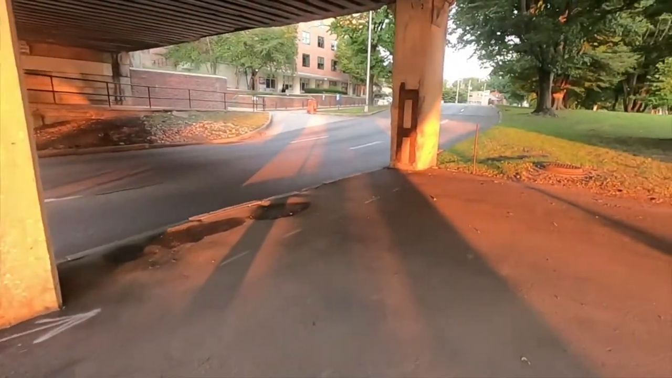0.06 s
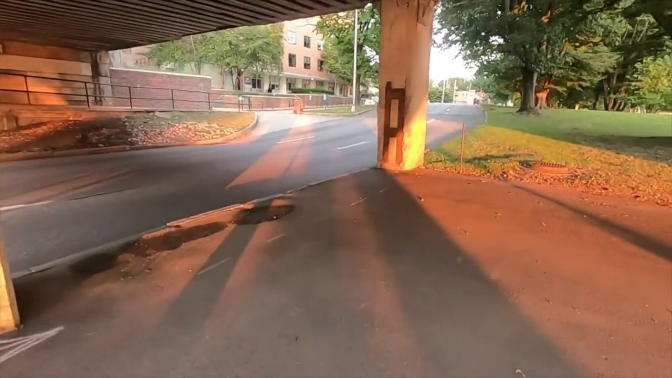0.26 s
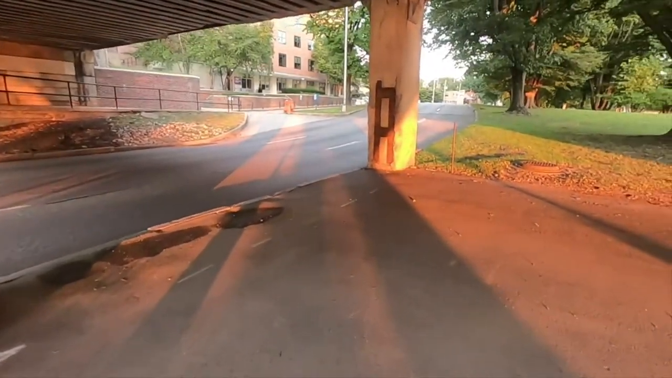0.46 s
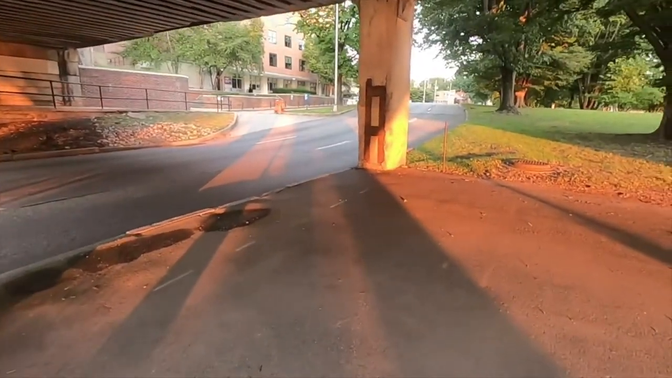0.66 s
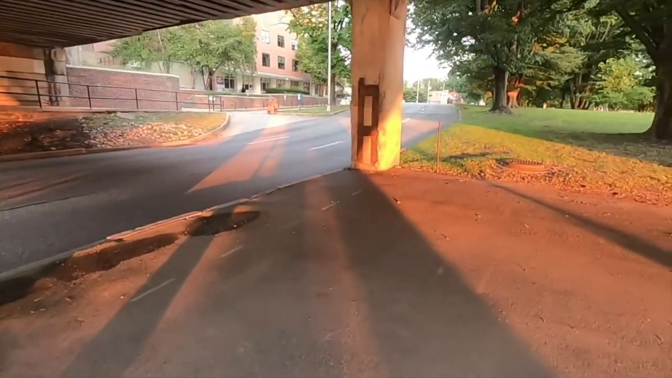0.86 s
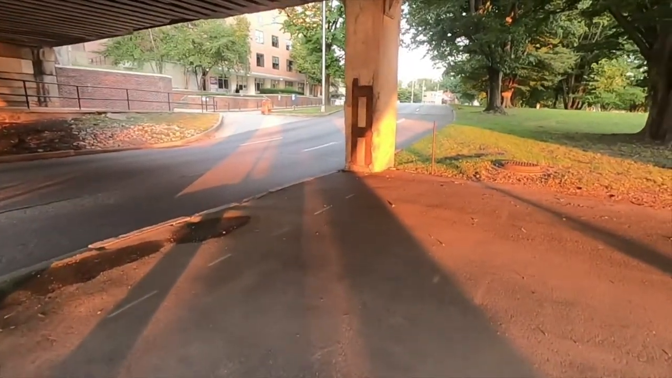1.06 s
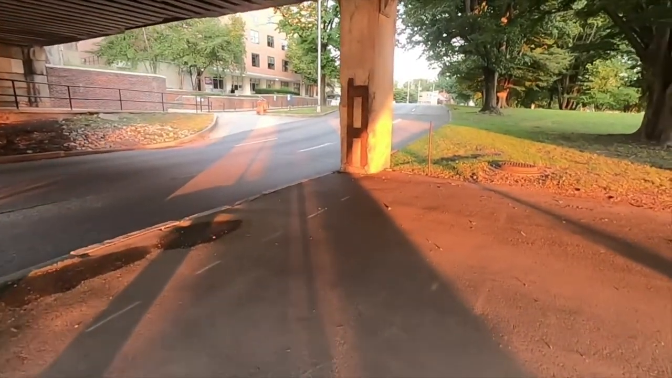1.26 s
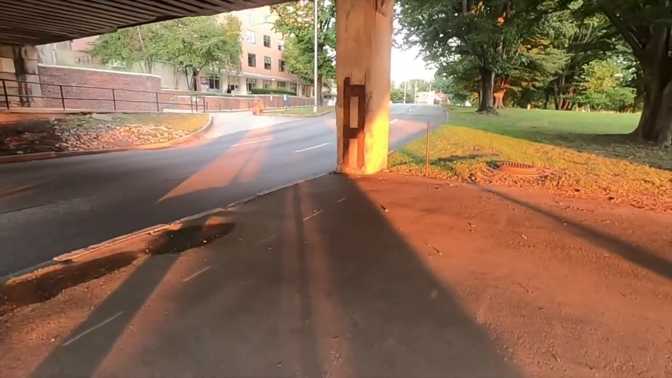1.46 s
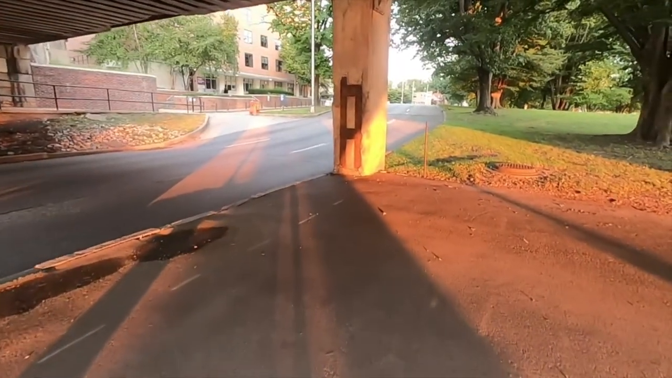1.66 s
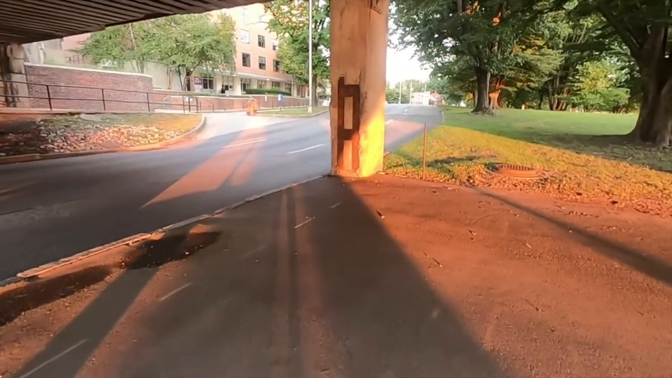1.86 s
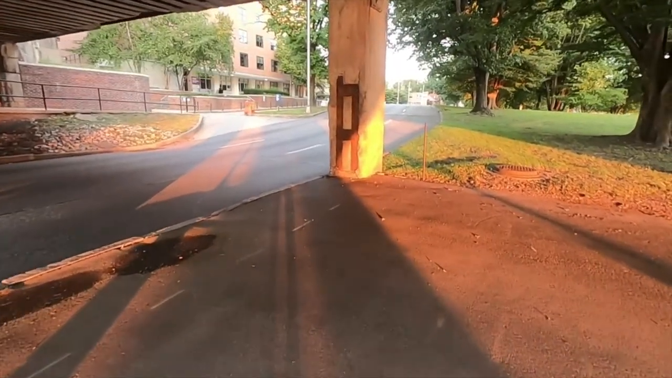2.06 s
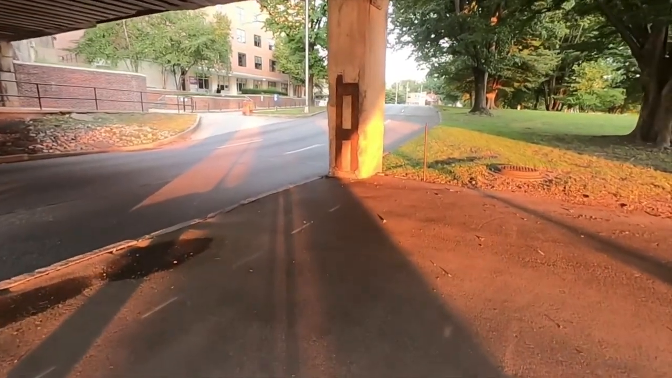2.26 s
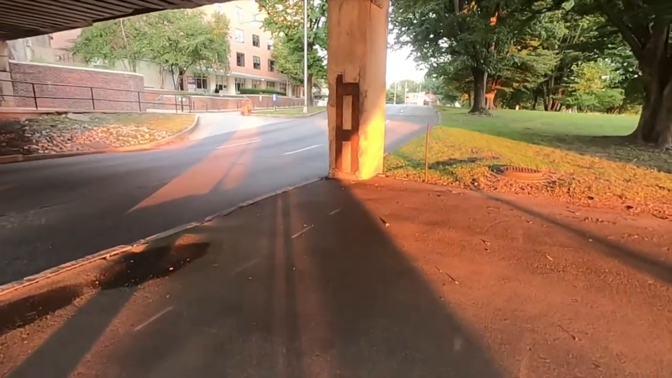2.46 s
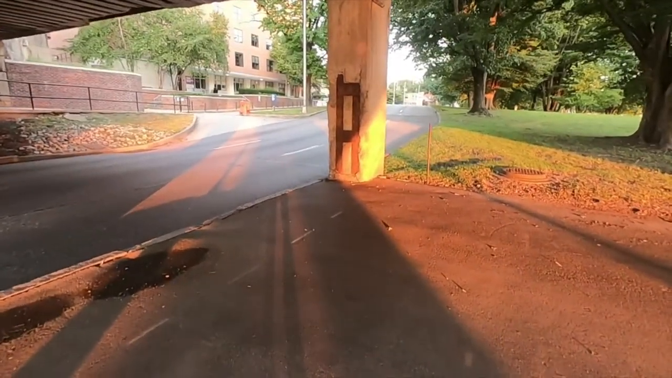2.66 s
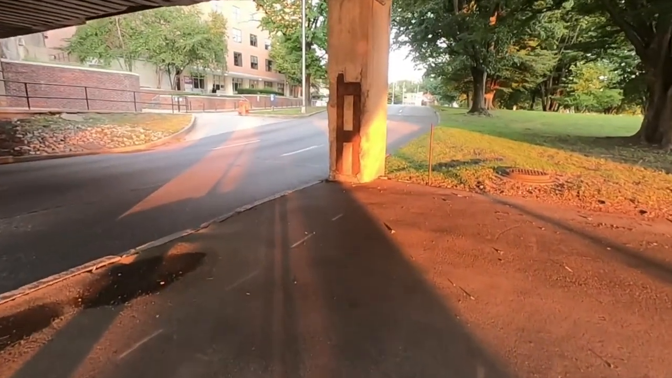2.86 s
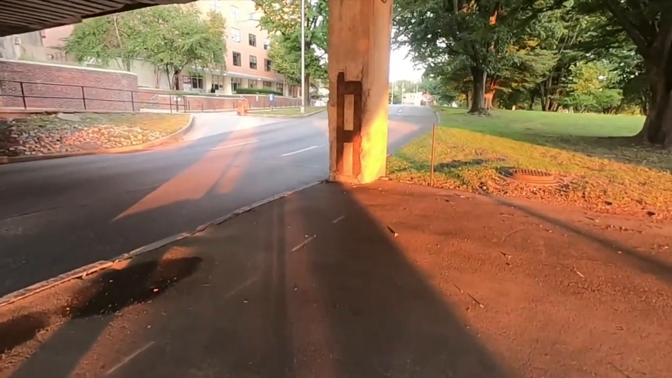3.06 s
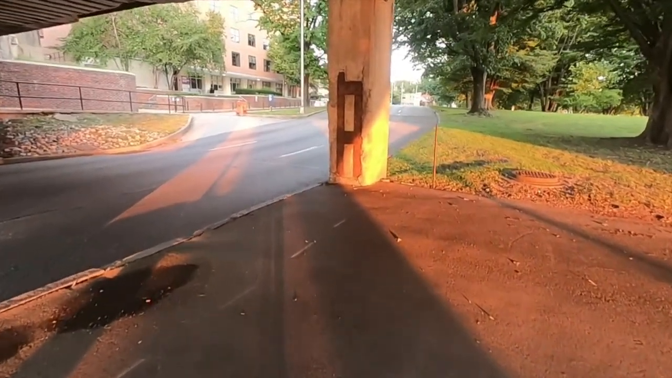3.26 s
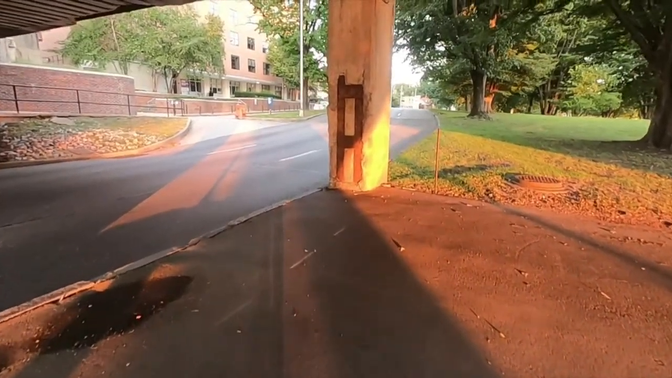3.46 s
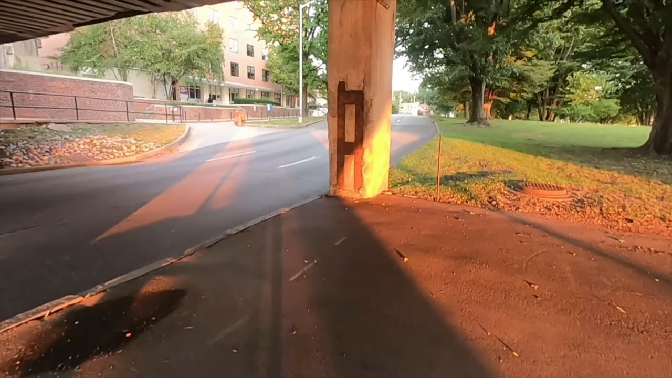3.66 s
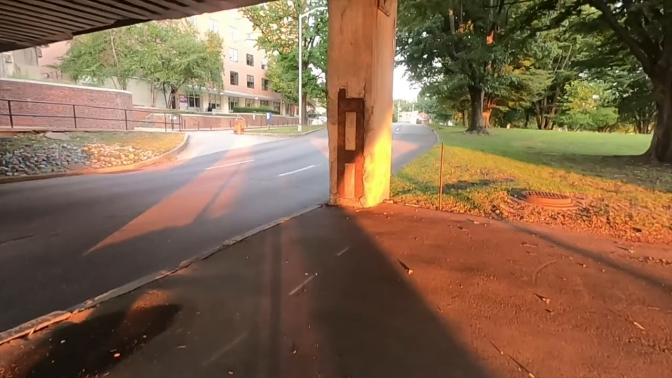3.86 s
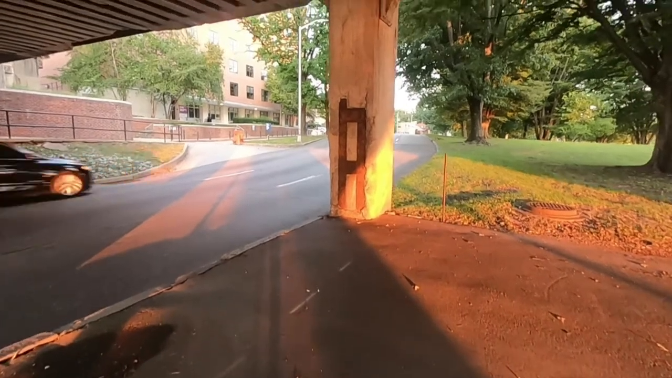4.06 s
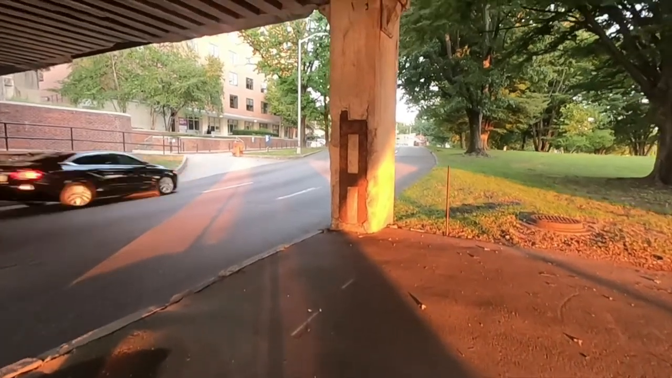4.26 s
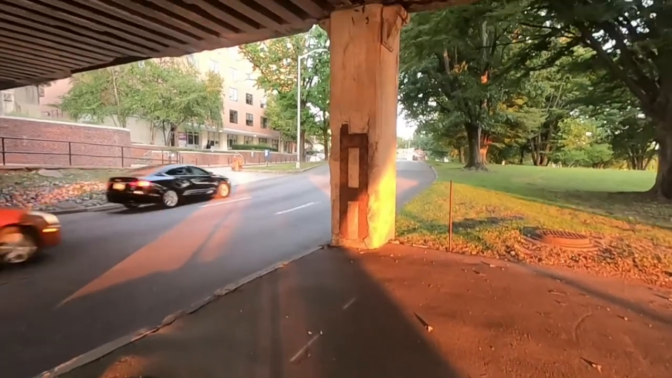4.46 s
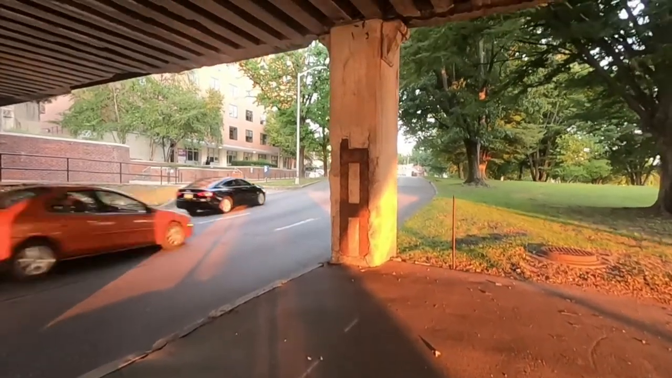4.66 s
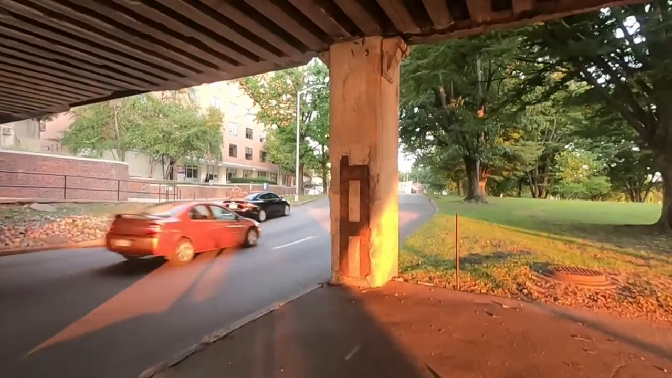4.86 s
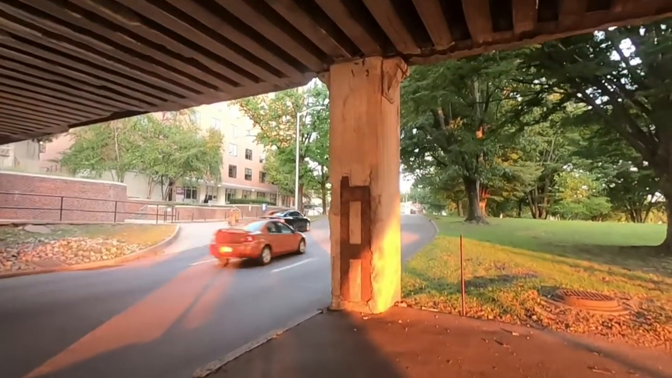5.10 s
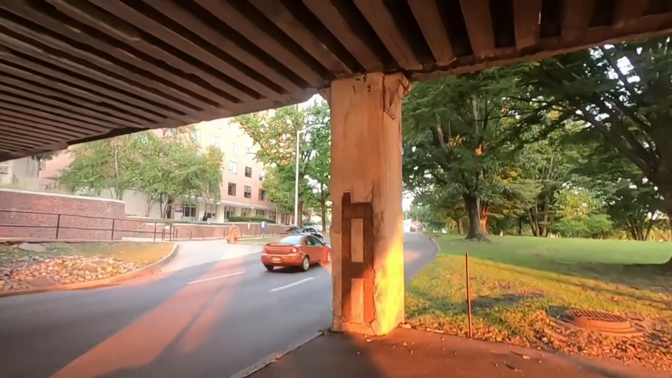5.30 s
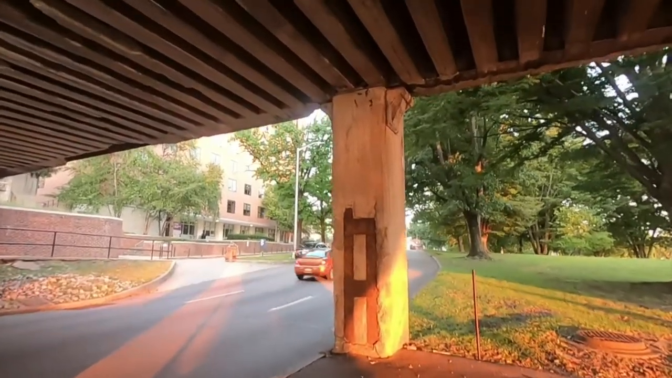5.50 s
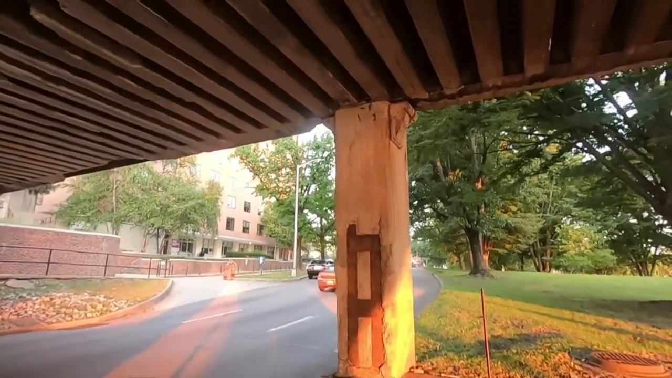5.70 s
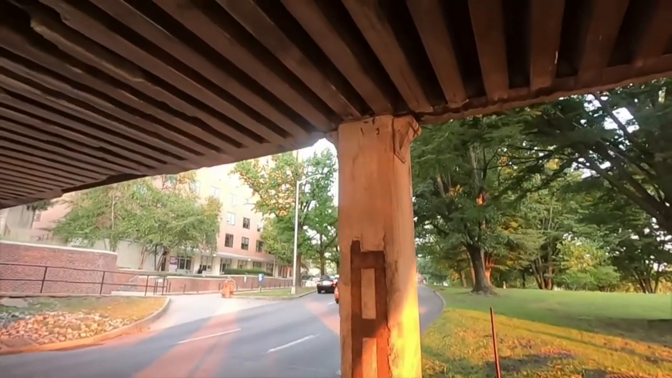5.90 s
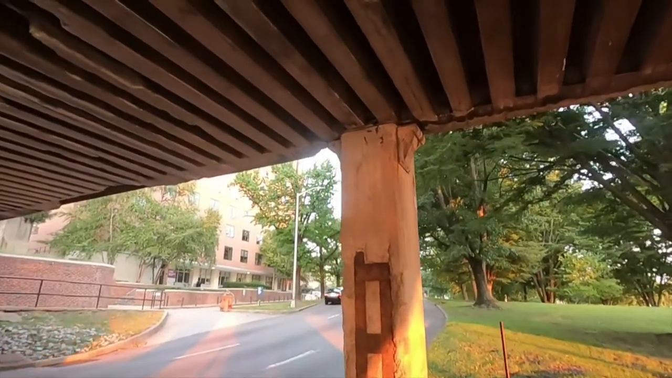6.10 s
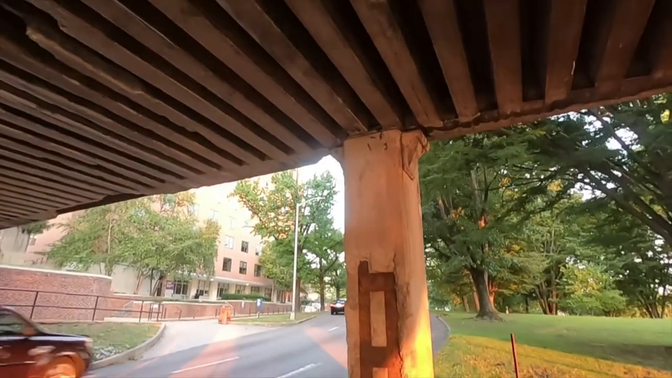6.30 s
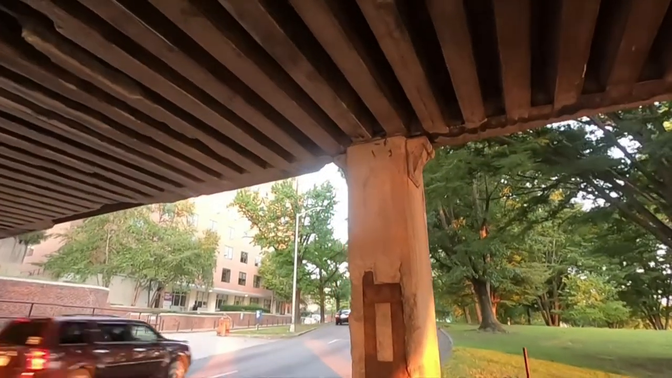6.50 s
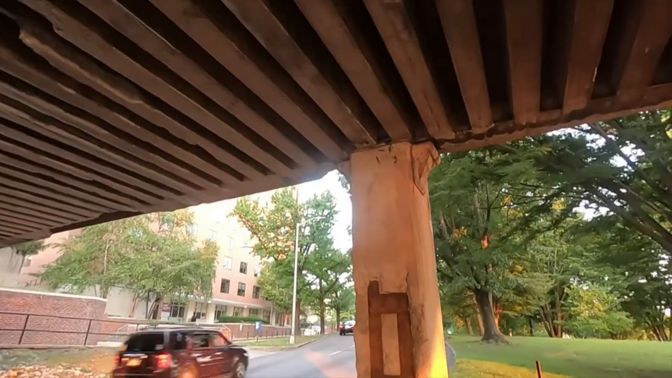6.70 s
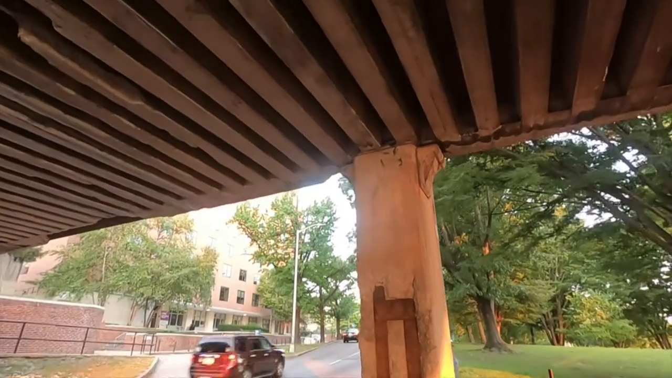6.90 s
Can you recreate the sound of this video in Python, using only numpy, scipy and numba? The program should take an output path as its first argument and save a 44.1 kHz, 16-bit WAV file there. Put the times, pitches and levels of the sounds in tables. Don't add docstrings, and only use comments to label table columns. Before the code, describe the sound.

In an underpass, quiet traffic rumble and distant town hiss gradually give way to passing cars. A small tap and grit ticks sound beside the small camera microphone early on. Five passes follow, each stronger: soft rush, fuller rush, two overlapping roars near four seconds, then the heaviest, with exhaust boom and a broken, singing tyre hum. Short concrete reflections thicken everything, and the microphone gain dips slightly.

```python
import sys
import numpy as np
from scipy import signal
from scipy.fft import rfft, irfft, next_fast_len
from scipy.io import wavfile
from scipy.ndimage import uniform_filter1d
from numba import njit

SR = 44100
rng = np.random.default_rng(int(sys.argv[2]) if len(sys.argv) > 2 else 0)


def transcribe(u):
    v = np.clip(np.atleast_2d(u).T, -1, 1)
    q = np.round(v * 32767).astype(np.int16)
    wavfile.write(sys.argv[1], SR, q)


def natural_amplitude(level_db):
    exponent = np.asarray(level_db, float) / 20
    return 10 ** exponent


N = 306054
T = np.arange(N) / SR
NEAR_S = 0.57
HUM_FADE_DB_PER_S = 93.5


def colour(shape):
    hz, db = np.transpose(shape)
    size = next_fast_len(N)
    f = np.maximum(np.fft.rfftfreq(size, 1 / SR), 1)
    gain = natural_amplitude(np.interp(np.log(f), np.log(hz), db, left=-200, right=-200))
    x = irfft(rfft(rng.standard_normal(size)) * gain, size)[:N]
    return x / x.std()


def walk(rate):
    fine = 16
    w = np.repeat(rng.standard_normal(int(N * rate / SR) + 2), fine)
    w = uniform_filter1d(uniform_filter1d(w, size=fine), size=fine)
    return np.interp(T * rate * fine, np.arange(len(w)), w / w.std())


def held(start, length, rise_db_per_s, fall_db_per_s):
    rise_db = -rise_db_per_s * np.maximum(start - T, 0)
    fall_db = -fall_db_per_s * np.maximum(T - start - length, 0)
    return rise_db + fall_db


def rush(shape, db, flicker_db):
    return colour(shape) * natural_amplitude(db + flicker_db * walk(rate=11))


def hum(hz, waver_hz, db):
    phase = 2 * np.pi * np.cumsum(hz + waver_hz * walk(rate=30)) / SR
    return np.sqrt(2) * natural_amplitude(db + 1.9 * walk(rate=14)) * np.sin(phase)


@njit
def resonance(x, hz, width):
    y, band, low = np.empty(len(x)), 0., 0.
    for i in range(len(x)):
        g = np.tan(np.pi * hz[i] / SR)
        k = width / hz[i]
        v = (band + g * (x[i] - low)) / (1 + g * (g + k))
        band = 2 * v - band
        low = low + 2 * g * v
        y[i] = k * v
    return y


# time level with it in seconds, then the levels in dB of
CARS = [
    (1.95, -39.5, -40.5, -79, -37.5),
    (2.85, -29, -37, -70.5, -38.5),
    (3.95, -26, -38, -60.5, -32),
    (4.55, -23, -37.5, -55.5, -29),
    (6.35, -20.5, -34.5, -59, -23),
]
TYRES, PUMPED_AIR, HISSING, ENGINE = 1, 2, 3, 4


def carried(column, over_db, coming_db, going_db, early_s, far_db, screen_db=0):
    power = natural_amplitude(far_db + 0 * T) ** 2
    for car in CARS:
        ahead = car[0] - early_s - T
        loss_db = np.where(ahead > 0, coming_db, going_db) / 2 * np.log10(1 + (ahead / NEAR_S) ** 2)
        hidden = np.clip((car[0] - .24 - T) / .056, 0, 1)
        power = power + natural_amplitude(car[column] + over_db - loss_db + screen_db * hidden) ** 2
    return 10 * np.log10(power)


# frequency in Hz, level in dB per Hz.
TOWN = [(1800, -17.5), (3000, 4.5), (3900, 2.5), (5000, 1.5), (6300, -5), (7700, -13), (8900, -19),
        (9500, -31), (10500, -29.5), (11300, -37.5), (12200, -49.5), (14000, -72.5)]


def town():
    level_db = carried(PUMPED_AIR, over_db=-18, coming_db=13, going_db=10, early_s=1.5, far_db=-51.5)
    return rush(TOWN, level_db, .3)


# start in seconds, length in seconds, first
# pitch in Hz, last pitch in Hz, level in dB.
HUMS = [
    (1.05, .3, 181, 180, -36),
    (2.3, 1.0, 142, 137, -37),
    (3.7, .4, 205, 202, -31),
    (3.95, .5, 228, 225, -29),
    (5.0, .55, 148, 159, -28),
    (2.7, .65, 228, 222, -33),
    (3.7, .6, 64, 64, -31),
    (3.3, .25, 121, 119, -29),
    (4.17, .15, 124, 122, -31),
    (4.7, .5, 72.5, 76, -26),
]


def hums():
    idle_db, idle_stops_s = -30, 1.96
    out = hum(hz=84.2, waver_hz=.5, db=idle_db + held(0, idle_stops_s, 0, HUM_FADE_DB_PER_S))
    for s, length, first, last, db in HUMS:
        hz = np.interp(T, [s, s + length], [first, last])
        out = out + hum(hz, .02 * hz, db + held(s, length, HUM_FADE_DB_PER_S, HUM_FADE_DB_PER_S))
    return out


# time in seconds, level in dB.
TICKS = [
    (.053, -58),
    (.485, -62),
    (.65, -61),
    (1.05, -64),
    (1.45, -62),
    (1.55, -63),
    (2.05, -61),
]


def shoe():
    hiss = colour([(7000, -7), (10000, 2.5), (12000, 0), (14500, -17)])
    scuff_db = -68.5 + held(.255, 0, rise_db_per_s=200, fall_db_per_s=254)
    push = natural_amplitude(scuff_db + 2.5 * walk(rate=150))
    for s, db in TICKS:
        push += natural_amplitude(db - 12) * np.exp(-((T - s) / .001) ** 2)
    tap_hz, tap_db, tap_span_s = 1250, -16, .00045
    t = T - .2625
    tap = natural_amplitude(tap_db) * np.sin(2 * np.pi * tap_hz * t) * np.exp(-(t / tap_span_s) ** 2)
    return hiss * push + tap


# frequency in Hz, level in dB per Hz.
DECK = [(10, -22), (24, -2), (38, -2.5), (65, -0.5), (88, -3), (110, -18.5)]
EXHAUST = [(70, -2), (100, -3), (135, 0), (175, 0), (230, -17.5)]
CAVITY = [(160, -28.5), (195, 0.5), (230, 1.5), (265, -1), (320, -23.5)]


def boom():
    deck_db = -27.5 + held(0, 5.4, 0, fall_db_per_s=2)
    exhaust_db = carried(ENGINE, over_db=-0.4, coming_db=19.5, going_db=23.5, early_s=-0.45, far_db=-32.5)
    cavity_db = carried(TYRES, over_db=-2.5, coming_db=19, going_db=11.5, early_s=0.36, far_db=-40, screen_db=-6)
    return rush(DECK, deck_db, 0.23) + rush(EXHAUST, exhaust_db, 0.51) + rush(CAVITY, cavity_db, 0.43)


# start in seconds, length in seconds, level in dB.
DRONE_GAPS = [
    (5.592, 0.093, -21),
    (5.766, 0.097, -18.5),
    (5.986, .03, -20.5),
    (6.167, 0.13, -15.5),
    (6.33, 0.065, -23),
    (6.422, .17, -13),
    (6.634, 0.027, -12),
    (6.716, 0.049, -14.5),
    (6.824, 0.18, -25),
]


def drone():
    wheel_turns_hz, throb_at_s, throb_db = 13.2, 6.44, 2.5
    turn = 2 * np.pi * wheel_turns_hz * (T - throb_at_s) + .5 * walk(rate=5)
    along = (6.1 - T) / .3
    hz = 204.5 * (1 + .036 * along / np.hypot(1, along))
    phase = 2 * np.pi * np.cumsum(hz + 2 * walk(rate=40)) / SR
    edge_db_per_s = 203
    seen = [db + held(s, length, edge_db_per_s, edge_db_per_s) for s, length, db in DRONE_GAPS]
    behind_pillars = -29 + held(4.95, N / SR, HUM_FADE_DB_PER_S, 0)
    db = np.max(seen + [behind_pillars], axis=0)
    return np.sqrt(2) * natural_amplitude(db + throb_db * np.cos(turn)) * np.sin(phase)


# tread-block pitch in Hz, groove pitch in Hz.
TREAD_HZ = [
    (910, 1590),
    (820, 1540),
    (770, 1400),
    (820, 1400),
    (705, 1400),
]


def pitch(swing, column):
    along = np.array([(car[0] - T) / NEAR_S for car in CARS])
    weight = natural_amplitude(np.array(CARS)[:, 1:2]) ** 2 / (1 + along ** 2) ** 2
    hz = np.array(TREAD_HZ)[:, column:column + 1] * (1 + swing * along / np.hypot(1, along))
    return (weight * hz).sum(axis=0) / weight.sum(axis=0)


# frequency in Hz, level in dB per Hz.
SIDEWALL = [(150, -31.5), (260, -3), (350, -1), (480, -4.5), (800, -37)]
TREAD = [(350, -10.5), (540, 0.5), (760, -2.5), (1000, -2), (1300, -1), (2000, -22)]
PUMPING = [(900, -7.5), (1500, -1.5), (1900, -3.5), (2450, -11.5), (3000, -18), (3600, -20.5), (4300, -33)]
SIZZLE = [(3000, -5.5), (5500, -8.5), (7700, -10.5), (8800, -13), (9500, -19.5), (10400, -16), (12000, -26),
          (14000, -35), (14600, -57)]


def tyres():
    sidewall_db = carried(TYRES, over_db=-4.5, coming_db=23.5, going_db=30, early_s=-0.27, far_db=-39,
                          screen_db=-1.5)
    tread_db = carried(TYRES, over_db=-0.82, coming_db=22, going_db=21.5, early_s=0.31, far_db=-54, screen_db=-3)
    air_db = carried(PUMPED_AIR, over_db=0.5, coming_db=20.5, going_db=7, early_s=0.5, far_db=-51.5)
    sizzle_db = carried(HISSING, over_db=0, coming_db=32.5, going_db=14, early_s=-0.06, far_db=-80)

    tread = rush(TREAD, tread_db, 0.37)
    blocks = resonance(tread, pitch(swing=0.047, column=0), 400.)
    grooves = resonance(colour(PUMPING), pitch(swing=0.14, column=1), 270.)
    grooves *= natural_amplitude(air_db - 5) / grooves.std()
    roar = rush(SIDEWALL, sidewall_db, 0.33) + .6 * tread + .9 * blocks
    return roar + grooves + rush(PUMPING, air_db, 0.3) + rush(SIZZLE, sizzle_db, 0.81)


# delay in seconds, level in dB.
ECHOES = [
    (.0012, -17.5),
    (.011, -16.5),
    (0.028, -15),
]


def scene():
    road = tyres() + boom()
    heard = road.copy()
    for s, db in ECHOES:
        lag = SR * s * (1 + .15 * walk(rate=1.5))
        heard += natural_amplitude(db) * np.interp(np.arange(N) - lag, np.arange(N), road)
    mix = town() + hums() + shoe() + drone() + natural_amplitude(0.61) * heard
    return mix[None]


def top_cut(x):
    return signal.sosfilt(signal.butter(12, 14420, fs=SR, output="sos"), x)


# time in seconds, gain in dB.
CAMERA_GAIN = [
    (0, -0.6),
    (2.5, -0.7),
    (3.6, -1.5),
    (4.6, -0.2),
    (5.0, -0.5),
    (5.35, -2),
    (5.8, -1.5),
    (6.3, -3),
    (6.94, -3),
]


def record(dry):
    s, gain_db = np.transpose(CAMERA_GAIN)
    x = dry * natural_amplitude(np.interp(T, s, gain_db))
    return top_cut(np.tanh(.3 * x) / .3)


dry = scene()
out = record(dry)
transcribe(out)
```